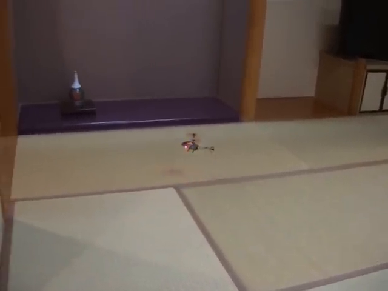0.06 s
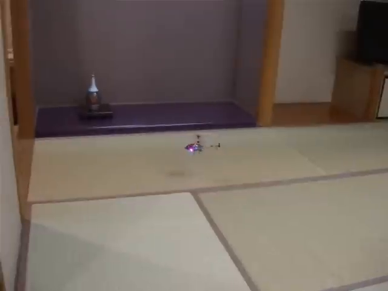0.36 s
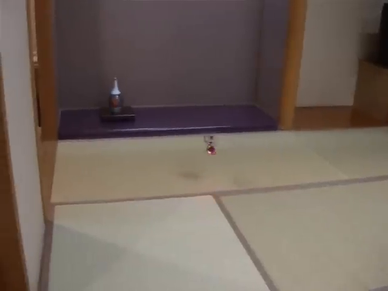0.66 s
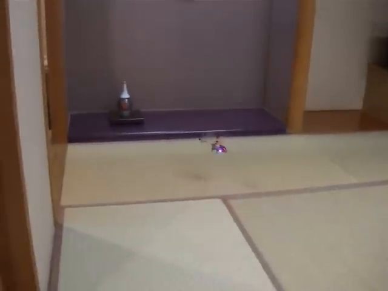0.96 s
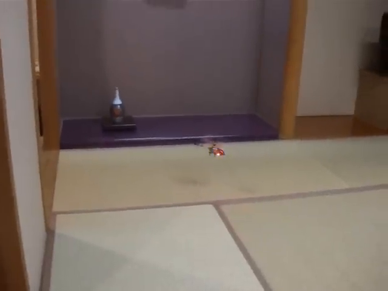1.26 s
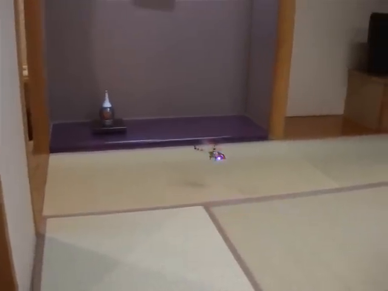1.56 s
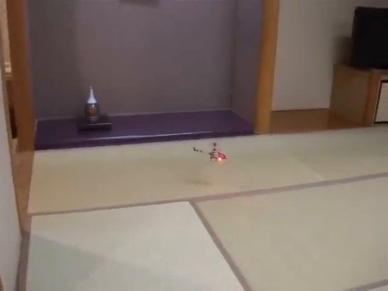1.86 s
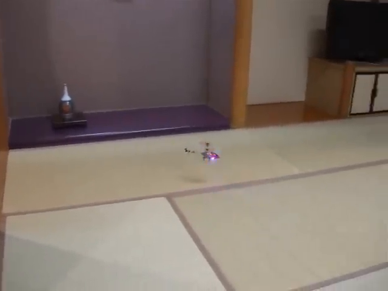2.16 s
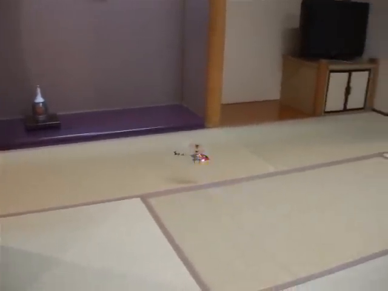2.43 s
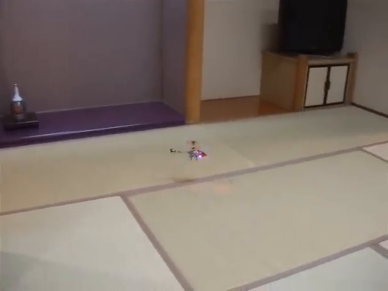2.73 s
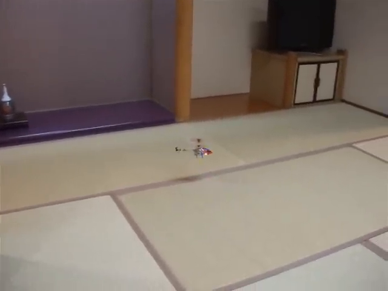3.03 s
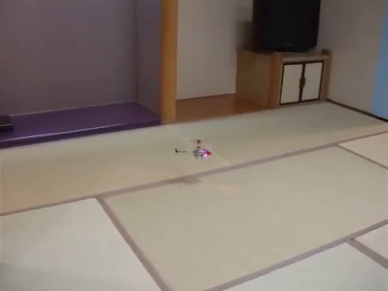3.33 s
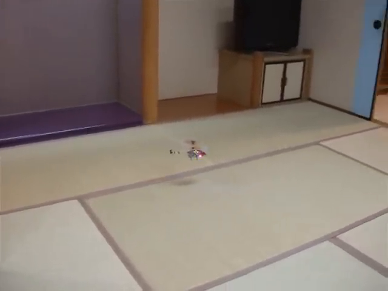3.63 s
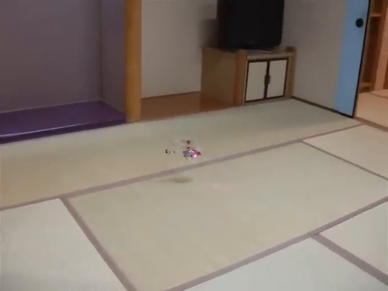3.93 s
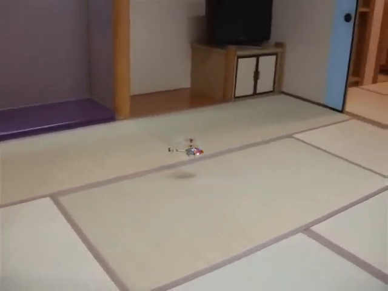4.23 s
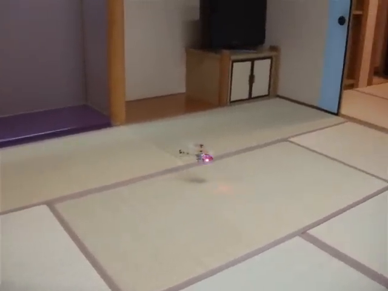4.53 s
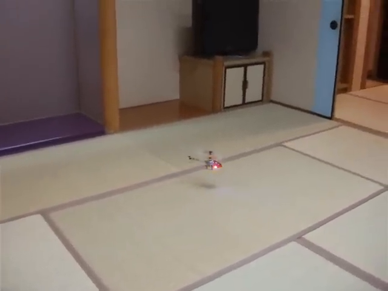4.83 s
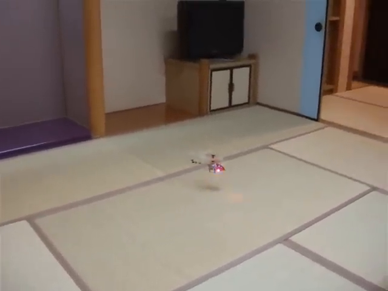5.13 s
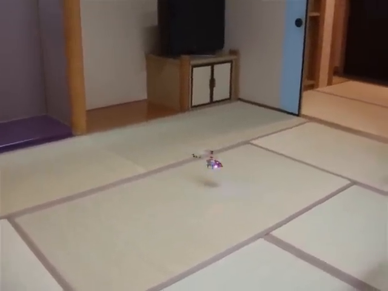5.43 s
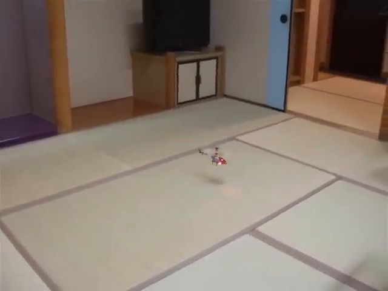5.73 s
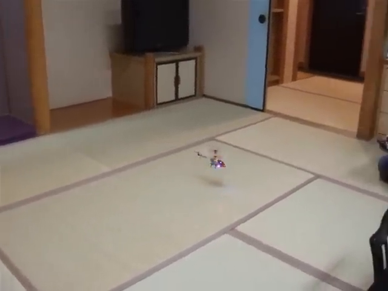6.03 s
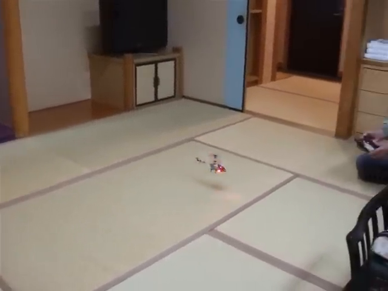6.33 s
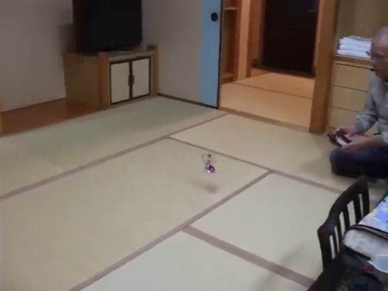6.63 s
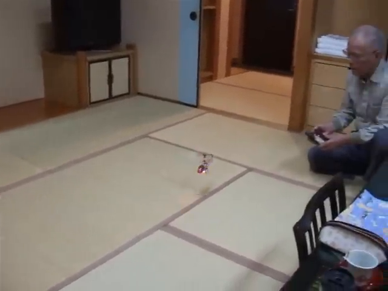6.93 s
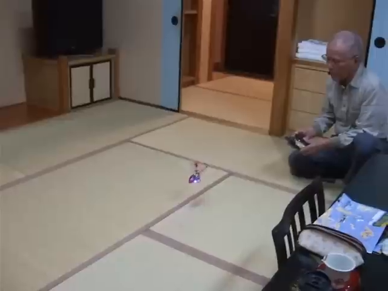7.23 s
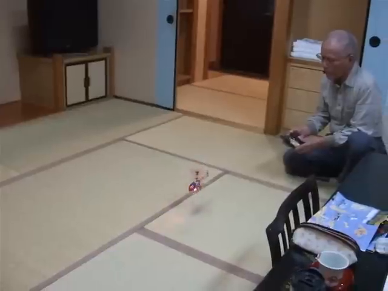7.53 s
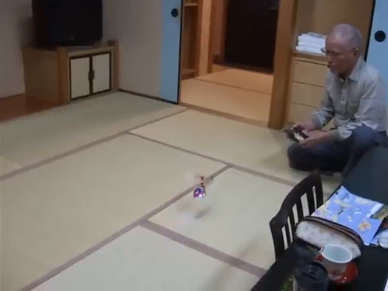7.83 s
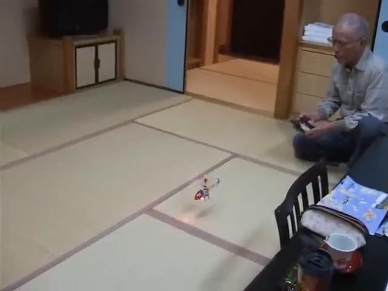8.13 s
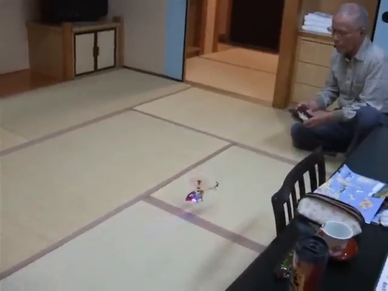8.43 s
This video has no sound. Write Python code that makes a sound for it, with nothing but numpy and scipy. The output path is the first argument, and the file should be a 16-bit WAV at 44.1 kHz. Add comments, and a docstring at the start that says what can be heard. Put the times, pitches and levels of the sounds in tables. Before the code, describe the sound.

A small toy helicopter hovers indoors, its tiny electric motors giving a high, wavering whine over a steady gear hiss.

```python
"""Toy helicopter in a small room

A toy with two counter-rotating rotors hovers over straw mats. Each rotor has its own tiny motor: the
two whine almost in unison, beating, and split apart whenever the craft turns. Plastic gears rasp, hiss
and ring the body, the blades flutter faintly, the motor drive whistles, and there is one soft pop.
A pocket camera samples the sound coarsely and holds each sample, mirroring the whine into the treble."""
import sys
import numpy as np
from scipy import signal
from scipy.fft import rfft, irfft, next_fast_len
from scipy.io import wavfile
from scipy.ndimage import uniform_filter1d, map_coordinates

SR = 44100
rng = np.random.default_rng(int(sys.argv[2]) if len(sys.argv) > 2 else 0)


def put_to_file(sound):
    """Save the sound as 16-bit audio at rate SR, in the file named by the first command-line argument."""
    columns = np.atleast_2d(sound).T  # one column per channel
    safe = np.clip(columns, -1, 1)
    whole_steps = np.round(safe * 32767)
    wavfile.write(sys.argv[1], SR, whole_steps.astype(np.int16))


N = 373527
TIME = np.arange(N) / SR

# Shaft speeds in hover. Each row: time in seconds, shared throttle in Hz, trim in Hz (added to the
# first motor, taken from the second).
HOVER_SPEEDS = [(0.0, 399.7, 2.5), (0.33, 398.3, 2.5), (0.48, 394.2, 2.5), (0.7, 402, 2.5), (1.2, 396, 3),
                (1.6, 395.6, 3.1), (1.95, 399, 1.6), (2.3, 402.9, 2.5), (2.6, 401.7, 1.5), (3.0, 400.8, 0),
                (3.3, 399.2, -0.32), (3.75, 396.3, -2.5), (4.35, 394.3, -2.5), (5.05, 396.2, -2.5),
                (6.5, 394, -1.78), (7.5, 393.4, -1.5), (8.1, 391, 2.5), (8.47, 393, 2.1)]
# Turns of the craft. Each row: start, rise, hold and fall in seconds, extra trim in Hz.
TURNS = [(0.33, 0.14, 0.13, 0.36, -30), (0.84, 0.11, 0.03, 0.46, 16), (4.41, 0.1, 0.01, 0.12, 21),
         (4.58, 0.079, 0.1, 0.69, -5), (5.43, 0.08, 0.01, 0.14, 11), (6.5, 0.22, 0.12, 0.1, 25),
         (6.92, 0.1, 0.02, 0.5, -8.5), (8.0, 0.08, 0.03, 0.14, 7)]
# Harmonics of the whine. Each row: order (multiple of the shaft speed), then base levels in dB of the
# first motor's core, the second motor's core and the rough skirt of each.
HARMONICS = [(1, -62.5, -63, -65), (4, -56, -60, -60), (5, -48, -45.5, -45.5), (6, -43.5, -46, -46),
             (7, -43, -48.5, -46), (8, -47.5, -50, -46.5), (9, -45, -50, -48.5), (10, -41, -43.5, -47.5),
             (11, -43, -45, -51), (12, -42, -41.5, -46.5), (13, -42.5, -45.5, -44), (14, -40, -42.5, -41),
             (15, -38.5, -45, -42.5), (16, -41, -42, -40.5), (17, -43.5, -44, -42.5), (18, -42, -41, -47),
             (19, -45, -47, -50)]
# Brief whistles of one harmonic. Each row: middle and length in seconds, motor 1 or 2, order, rise in dB.
WHISTLES = [(0.06, 0.26, 1, 6, 7.5), (0.25, 0.22, 1, 7, 13.5), (0.55, 0.36, 1, 5, 13), (1.03, 0.2, 1, 7, 6),
            (1.3, 0.13, 1, 6, 8), (1.37, 0.13, 1, 7, 8.5), (1.58, 0.17, 1, 6, 6), (1.72, 0.11, 1, 7, 9),
            (1.75, 0.7, 1, 10, 6), (2.15, 0.3, 1, 7, 12), (2.58, 0.5, 1, 6, 6.5), (2.88, 0.6, 2, 5, 7),
            (3.07, 0.13, 1, 7, 8), (3.22, 0.3, 1, 6, 12), (3.73, 0.36, 1, 7, 10), (3.82, 0.45, 2, 5, 6),
            (3.95, 0.8, 1, 6, 5), (4.09, 0.16, 1, 17, 5), (4.45, 0.13, 1, 6, 10), (4.52, 0.14, 1, 5, 10),
            (5.22, 0.54, 1, 6, 10.5), (6.44, 0.2, 1, 6, 12), (6.45, 0.16, 1, 7, 12), (6.68, 0.3, 1, 7, 8),
            (7.21, 0.18, 1, 7, 13), (7.36, 0.25, 2, 5, 10), (7.55, 0.8, 1, 11, 7), (7.6, 0.42, 1, 6, 8),
            (8.02, 0.38, 1, 7, 8.5), (8.1, 0.15, 1, 6, 7)]
# Resonances of the first motor's mount. Each row: frequency in Hz, half width in Hz, gain in dB.
MOUNT_MODES = [(2390, 75, 4.5), (5640, 120, 6)]
# How squarely the flank faces the microphone. Each row: time in seconds, share from 0 to 1 (side-on).
FLANK_FACING = [(0.0, 0.95), (0.3, 0.6), (0.5, 0.1), (1.35, 0.35), (1.75, 0.11), (2.1, 0.7), (3.25, 1.0),
                (3.6, 0.45), (4.1, 0.85), (4.4, 0.7), (4.7, 0.1), (6.5, 0.15), (7.2, 0.35), (8.47, 0.25)]
# Harmonics of the first motor that radiate from the flank. Each row: order, side-on gain in dB.
FLANK_HARMONICS = [(12, 3), (13, 3), (17, 13.5), (18, 7)]
# Spectrum of the gear hiss. Each row: frequency in Hz, relative level in dB.
HISS_SPECTRUM = [(300, -31.5), (1050, -25.5), (1400, -14.5), (1850, -12), (2200, -19.5), (2600, -15.5),
                 (3350, -12.5), (3700, -9), (4300, -6), (5050, -8), (5750, -2.5), (6500, -4), (7200, 0.5),
                 (7900, 2)]
# Envelope of the gear hiss. Each row: time in seconds, relative level in dB.
HISS_ENVELOPE = [(0.0, -21.5), (0.15, -22.5), (0.3, -19.7), (0.7, -21.5), (1.7, -22.5), (1.9, -21),
                 (2.15, -22.9), (2.45, -22), (3.85, -21.5), (4.1, -23.2), (4.57, -21), (5.8, -22),
                 (6.05, -23.2), (6.5, -22), (7.2, -20.5), (7.65, -21), (8.47, -21.5)]
# The body's ring, then the whine's rough 12th harmonic. Each row: frequency in Hz, width in Hz.
FUZZY_BANDS = [(3900, 490), (4780, 180)]
# Envelope of the body's ring. Each row: time in seconds, relative level in dB.
RING_ENVELOPE = [(0.0, -26.5), (1.0, -26.5), (1.25, -29.5), (1.9, -27.5), (2.3, -36), (2.75, -34),
                 (3.35, -27), (3.95, -28.5), (4.1, -40), (4.6, -31), (7.85, -31.5), (8.2, -25), (8.47, -26)]
# Air stirred by the rotors, and the quiet room. Each row: frequency in Hz, spectral density in dB.
AIR_SPECTRUM = [(15, -66), (40, -83), (100, -79), (250, -79.5), (420, -79.5), (700, -80.5), (1500, -79.5),
                (6000, -100)]
# A soft, dull pop. Each row: start in seconds, level in dB, pitch in Hz, length in seconds.
SOFT_POPS = [(6.138, -23, 293, 0.007)]


def amp(db):
    """Converts decibels to an amplitude ratio."""
    return 10 ** (np.asarray(db) / 20)


def unit(x):
    """Normalises a signal to rms 1."""
    return x / np.sqrt(np.mean(abs(x) ** 2) + 1e-20)


def curves(rows):
    """Linear interpolation of (seconds, ..) rows: one curve for each column after the time."""
    times, *columns = np.transpose(rows)
    return [np.interp(TIME, times, column) for column in columns]


def colour(x, spectrum):
    """Spectral shaping by (Hz, dB) points, joined on a logarithmic frequency axis."""
    hz, db = np.transpose(spectrum)
    size = next_fast_len(N)
    bins = np.fft.rfftfreq(size, 1 / SR)
    gain = amp(np.interp(np.log(bins + 1), np.log(hz), db))
    return irfft(rfft(x, size) * gain, size)[:N]


def low_pass(x, hz):
    """Steep band limiting by a windowed sinc filter."""
    return signal.oaconvolve(x, signal.firwin(6001, hz, window=("kaiser", 9), fs=SR), "same")


def wander(width_hz, size=16384):
    """Low-pass complex noise: a random drift of rms about 1, mostly slower than width_hz."""
    hz = np.fft.fftfreq(size, N / SR / size)
    noise = rng.standard_normal(size) + 1j * rng.standard_normal(size)
    drift = unit(np.fft.ifft(noise / (1 + (hz / width_hz) ** 2)))
    return np.interp(np.arange(N) * size / N, np.arange(size), drift)


def narrow_noise(hz, half_width_hz):
    """Random modulation spreads a tone into a narrow band of noise, of rms 1."""
    return unit((wander(half_width_hz) * np.exp(2j * np.pi * hz * TIME)).real)


def shaft_speeds(turn_lift=0.22):
    """Differential steering: a turn speeds one motor up and slows the other. Both speeds are in Hz."""
    throttle, trim = curves(HOVER_SPEEDS)
    steer = sum(hz * np.interp(TIME, start + np.cumsum([0, rise, hold, fall]), [0, 1, 1, 0])
                for start, rise, hold, fall, hz in TURNS)
    shared = throttle + turn_lift * abs(steer)
    return shared + trim + steer, shared - trim - steer


def whistle_db(motor_number, order):
    """Amplitude envelope of one harmonic's whistles: each is a parabolic arch in decibels."""
    return sum(db * np.maximum(1 - (2 * (TIME - middle) / length) ** 2, 0)
               for middle, length, number, multiple, db in WHISTLES
               if (round(number), round(multiple)) == (motor_number, order))


def motor(speed, harmonics, swell_db, fade, throb, jitter, strain_hz_per_s, rotor_hz=31.715):
    """Harmonic series of a shaft: rotor load modulates each clean core, gear play adds a rough skirt."""
    revolutions = np.cumsum(speed * (1 + jitter * wander(24.34).real)) / SR
    rotor = np.exp(2j * np.pi * revolutions * rotor_hz / speed.mean())
    # While the speed changes fast the teeth rattle loose, and the high harmonics lose their core.
    strain = uniform_filter1d(abs(np.gradient(speed)) * SR, size=8000) / strain_hz_per_s
    rattle = amp(1.5 * np.tanh(strain))
    out = np.zeros(N)
    for order, core_db, skirt_db in harmonics:
        swell = amp(swell_db(order))
        fading = unit(1 + fade * wander(2.2))
        core = amp(core_db) * swell * fading / np.sqrt(1 + (strain * order / 10) ** 2)
        load = 1 + throb * (rotor * np.exp(2j * np.pi * rng.random())).real
        skirt = amp(skirt_db) * swell ** 0.33 * rattle * wander(width_hz=89)
        carrier = np.exp(2j * np.pi * (order * revolutions + rng.random()))
        out += np.sqrt(2) * ((core * load + skirt) * carrier).real
    return out


def whine(first_hz, second_hz, drift_db=1.2, drift_hz=2.5):
    """Beating: the harmonics of two motors at nearly the same speed interfere."""
    orders, first_db, second_db, skirt_db = np.transpose(HARMONICS)
    orders = np.round(orders)
    facing = curves(FLANK_FACING)[0]

    def first_swell_db(order):
        """Mount resonance and flank directivity lift a harmonic, on top of its whistles and drift."""
        resonance = sum(db / (1 + ((order * first_hz - hz) / half_width) ** 2)
                        for hz, half_width, db in MOUNT_MODES)
        beam = sum(db * facing for multiple, db in FLANK_HARMONICS if round(multiple) == order)
        return whistle_db(1, order) + resonance + beam + drift_db * unit(wander(drift_hz).real)

    first = motor(first_hz, zip(orders, first_db, skirt_db), first_swell_db,
                  fade=0.2, throb=0.19, jitter=0.0009, strain_hz_per_s=330)
    second = motor(second_hz, zip(orders, second_db, skirt_db), lambda order: whistle_db(2, order),
                   fade=0.5, throb=0.22, jitter=0.0011, strain_hz_per_s=180)
    return first + second


def gears(first_hz, second_hz, bite=0.19, flutter_db=0.32, rocking_db=0.34):
    """Friction noise: teeth scrape in bursts, once per shaft turn, and flutter under the rotors' load."""
    bursts = sum(np.cos(2 * np.pi * np.cumsum(speed) / SR) for speed in (first_hz, second_hz))
    scrape = rng.standard_normal(N) * (1 + bite * bursts / 2)
    scrape *= amp(flutter_db * unit(wander(56).real))
    hiss = unit(low_pass(colour(scrape, HISS_SPECTRUM), hz=8000.7))
    rocking = narrow_noise(hz=2.9, half_width_hz=0.8)  # the craft rocks in the air, and the hiss with it
    return hiss * amp(curves(HISS_ENVELOPE)[0] + rocking_db * rocking)


def near_echoes(x, echo_db=-15, drift_s=0.000205):
    """Comb filtering: echoes off floor and furniture shift as the craft drifts, changing the colour."""
    out = x.copy()
    for delay_s in (0.0013, 0.0029, 0.0052):
        lag = (delay_s + drift_s * wander(0.63).real) * SR
        out += amp(echo_db) * map_coordinates(x, [np.arange(N) - lag], order=3)
    return out


def room(x, t60_s=0.24, echoes_per_s=2000, gap_s=0.004, size=12000):
    """Reverberation: sparse reflections decay exponentially as the mats absorb them."""
    age = np.arange(size) / SR
    taps = rng.choice([-1., 1.], size) * (rng.random(size) < echoes_per_s / SR) * (age > gap_s)
    tail = taps * np.exp(-np.log(1000) * age / t60_s)
    return signal.oaconvolve(x, tail / np.linalg.norm(tail))[:N]


def fuzzy_tones(side_on_db=10):
    """Narrow-band noise: a body ring, and above it the whine's rough 12th harmonic, louder side-on."""
    ring_db = -4.5 + curves(RING_ENVELOPE)[0]
    harmonic_db = -41.5 + side_on_db * curves(FLANK_FACING)[0]
    return sum(amp(db) * narrow_noise(hz, width / 2)
               for (hz, width), db in zip(FUZZY_BANDS, (ring_db, harmonic_db)))


def blades(speed, level_db=-62, mean_passing_hz=63.43):
    """Blade-passing tone: two blades per rotor turn make a low flutter over a soft wash of air."""
    passes = np.cumsum(mean_passing_hz * speed / speed.mean()) / SR
    flutter = unit(((1 + 0.8 * wander(4)) * np.exp(2j * np.pi * passes)).real)
    air = colour(rng.standard_normal(N) * np.sqrt(SR / 2), AIR_SPECTRUM)
    return amp(level_db) * flutter + air


def motor_drive(level_db=-35.5, switching_hz=7779):
    """Switching tone: the drive gives a thin, high whistle that fades in and out at random."""
    return amp(level_db) * narrow_noise(switching_hz, half_width_hz=5.7)


def pop(overtone_ratio=2.25, overtone_db=-3):
    """A windowed tone burst: a soft, dull pop, two cycles long, with no ring."""
    out = np.zeros(N)
    for start, db, hz, length in SOFT_POPS:
        age = np.clip(TIME - start, 0, length)
        phase = 2 * np.pi * hz * age
        envelope = amp(db) * np.sin(np.pi * age / length) ** 2
        out += envelope * (np.sin(phase) + amp(overtone_db) * np.sin(overtone_ratio * phase))
    return out


def scene():
    """Superposition of the helicopter's sounds, their reflections and the pop at one microphone."""
    first_hz, second_hz = shaft_speeds()
    motors = whine(first_hz, second_hz)
    hiss = amp(-0.68) * near_echoes(gears(first_hz, second_hz))
    reverberation = amp(-10.5) * room(motors)
    mix = motors + reverberation + hiss + fuzzy_tones() + blades(first_hz) + motor_drive() + pop()
    return np.array([mix, mix])


def record(dry, camera_rate_hz=16001.4, band_limit_hz=15500):
    """Spectral imaging: the steps of a mono sample-and-hold mirror the sound about half its rate."""
    heard = low_pass(dry.mean(0), camera_rate_hz / 2)
    last_sample_s = np.floor(TIME * camera_rate_hz) / camera_rate_hz
    held = map_coordinates(heard, [last_sample_s * SR], order=3, mode="nearest")
    out = low_pass(held, band_limit_hz)
    return np.array([out, out])


dry = scene()
out = record(dry)
put_to_file(out)
```